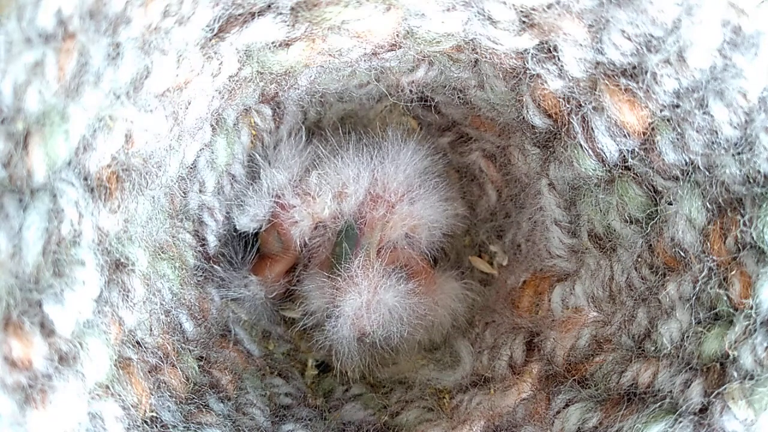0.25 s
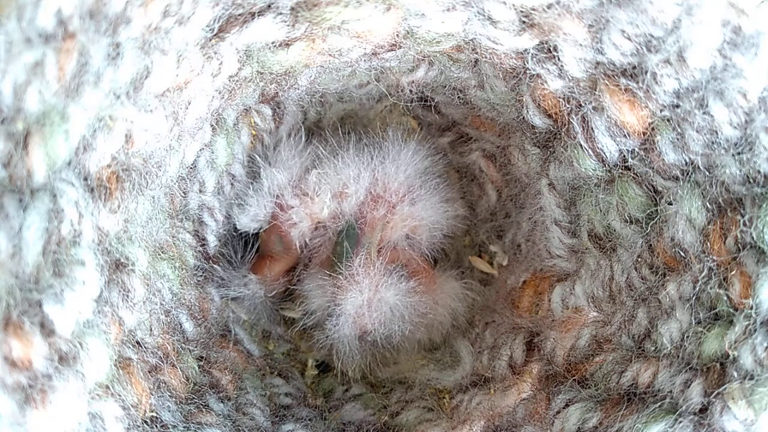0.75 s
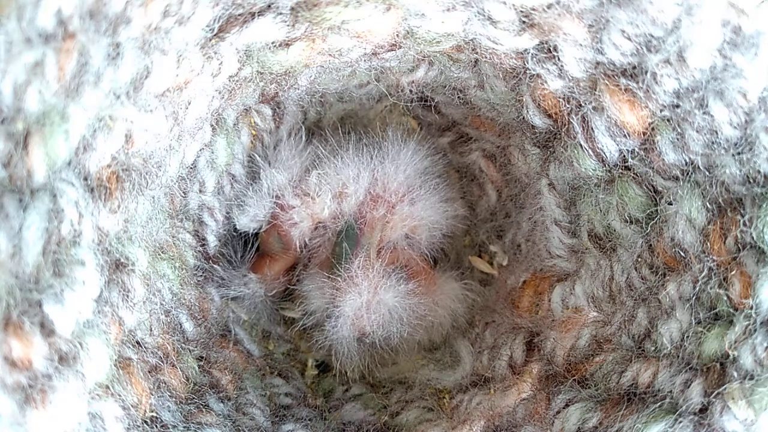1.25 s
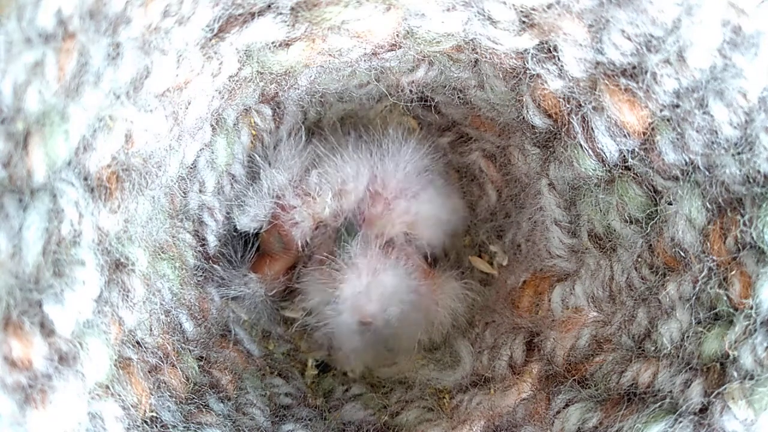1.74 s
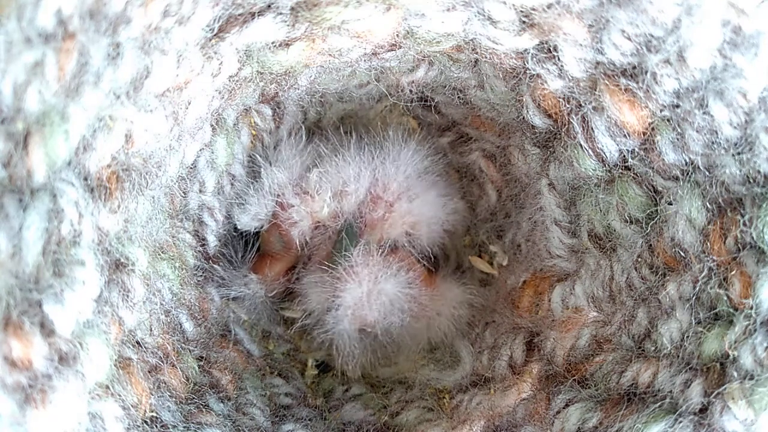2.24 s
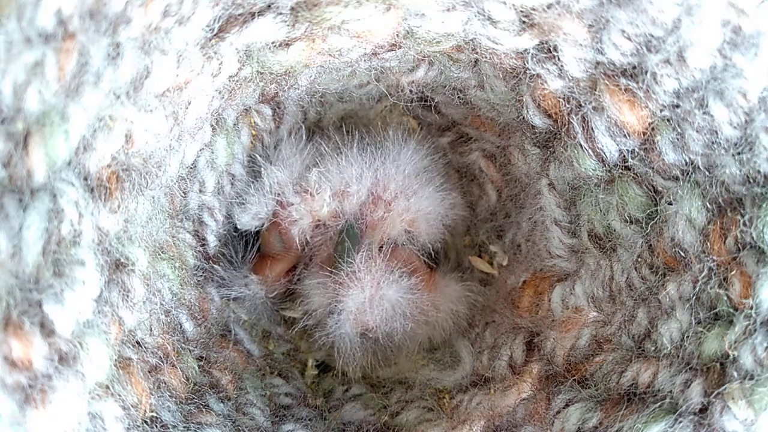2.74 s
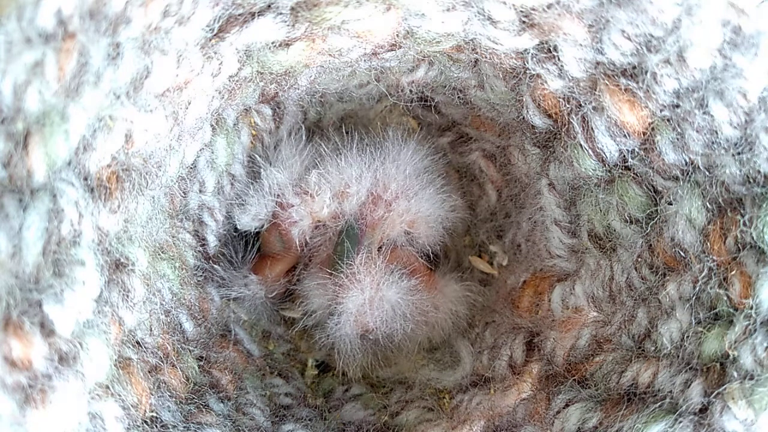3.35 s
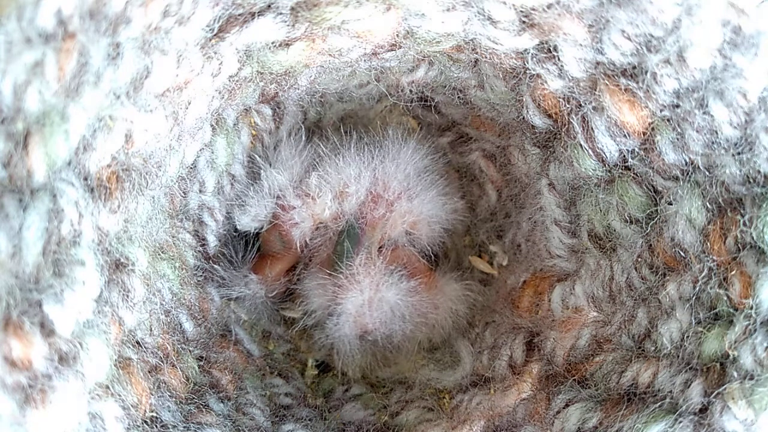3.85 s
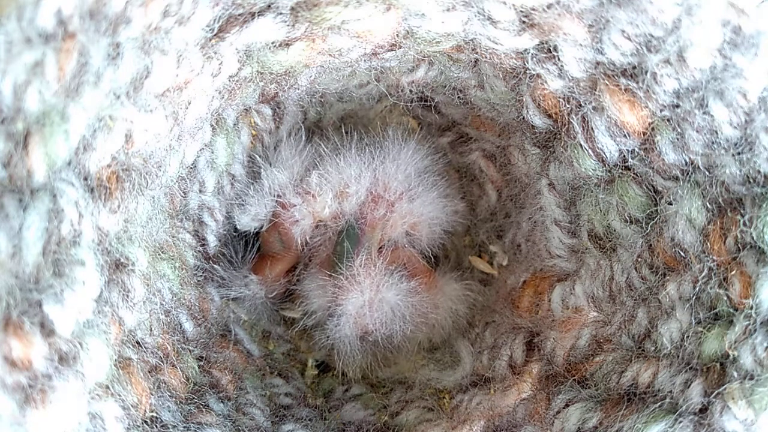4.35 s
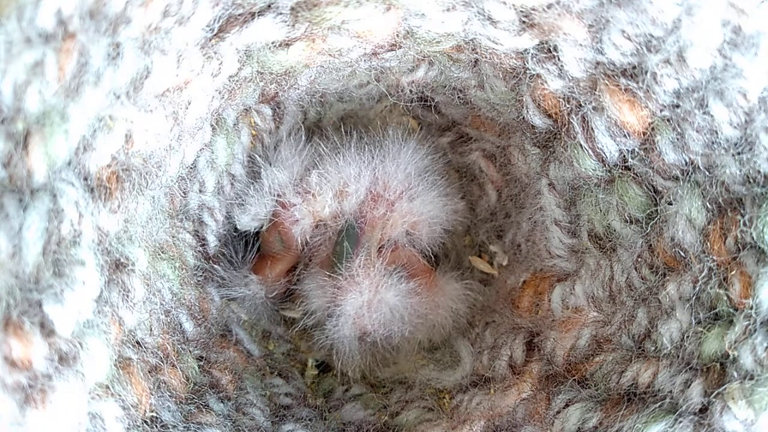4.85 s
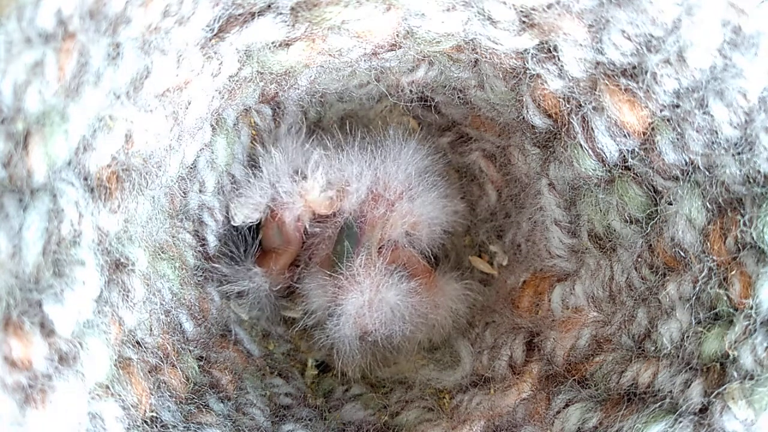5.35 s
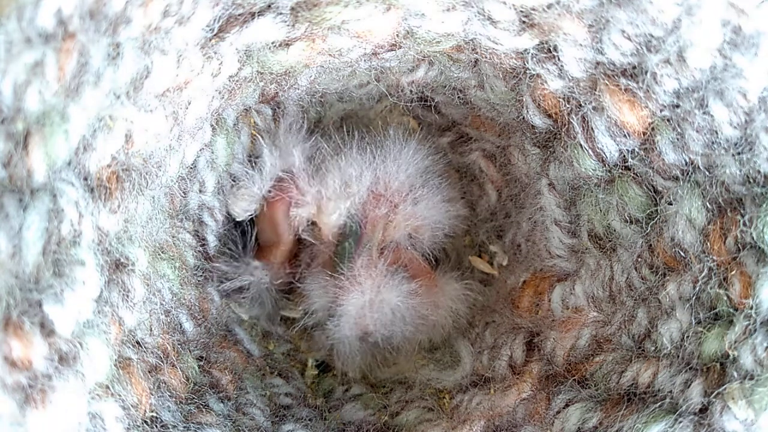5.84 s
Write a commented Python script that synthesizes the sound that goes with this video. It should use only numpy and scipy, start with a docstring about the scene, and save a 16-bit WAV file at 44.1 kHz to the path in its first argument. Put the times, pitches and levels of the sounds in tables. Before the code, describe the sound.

Sharp snaps and hollow taps with dry leaf and twig crackle close to a nest, over a faint outdoor hush with tiny distant bird rasps.

```python
"""Dry leaves and twigs crackle close to a nest: dense fibre noise swells to each snap and dies away.
Hard taps are a crack plus a damped sine; a farther knock and a long rub are noise through resonances.
One bird chirps near as a gliding sine with an overtone; another rasps far off as noise in a falling resonance.
Soft bumps ring the mount, faint far tones are narrow-band noise, and low gusts nudge two spaced
microphones over a faint outdoor hush, both partly coherent noise."""
import sys
import numpy as np
from scipy import signal
from scipy.io import wavfile
from scipy.ndimage import uniform_filter1d

SR = 44100
rng = np.random.default_rng(int(sys.argv[2]) if len(sys.argv) > 2 else 0)


def bounce(signal):
    """Save signal as a 16-bit WAV file at the path given by the first command-line argument."""
    frames = np.transpose(np.atleast_2d(signal))
    limited = np.clip(frames, -1, 1)
    pcm = np.round(limited * 32767).astype(np.int16)
    wavfile.write(sys.argv[1], SR, pcm)


N = 268216  # length in samples

# Spectrum of the body of breaking or rubbed fibres.
# Each row: frequency in Hz, relative spectral density in dB.
BODY_SPECTRUM = [(240, -64), (400, -12), (721, 4.5), (1420, 6.5), (1560, 1.5), (1810, 7), (3000, 1),
                 (3700, 5.5), (6000, -7.5), (7800, -36)]
# Spectrum of their treble.
# Each row: frequency in Hz, relative spectral density in dB.
TREBLE_SPECTRUM = [(2650, -19), (4500, -10), (5600, -8.5), (6820, -4.5), (8230, -1.5), (10100, -6.5),
                   (15100, -12.5), (15600, -25)]
LAG_S = 0.00029  # the left microphone hears first


def gain_of(db):
    """Level is logarithmic: 20 dB is a factor of ten in amplitude."""
    return 10 ** (np.asarray(db) / 20)


def evened(x):
    """Normalization of mean power: scales to rms 1."""
    return x / np.sqrt(np.mean(x ** 2) + 1e-20)


def read(points, hz):
    """Interpolation of a table along a logarithmic frequency axis."""
    f, value = np.transpose(points)
    return np.interp(np.log(hz + 1), np.log(f + 1), value)


def curve(rows):
    """Linear interpolation in time: the times and columns of a table, sample by sample."""
    s, *columns = np.transpose(rows)
    t = np.arange(s[0], s[-1], 1 / SR)
    return t, [np.interp(t, s, c) for c in columns]


def add(mix, s, sound, pan_db=0.):
    """Superposition: adds a sound at time s, panned by the level difference left minus right."""
    part = mix[:, round(s * SR):][:, :sound.shape[-1]]
    pan = gain_of([[pan_db / 2], [-pan_db / 2]])
    part += (sound * pan)[:, :part.shape[1]]


def resonate(x, hz, width):
    """Resonance by heterodyning: shifts hz down to zero, smooths, and shifts back."""
    turn = np.exp(2j * np.pi * np.cumsum(hz * np.ones(x.shape[-1])) / SR)
    r = np.exp(-np.pi * width / SR)
    smooth = signal.lfilter([1 - r], [1, -r], x / turn + 1e-18)
    return 2 * (turn * smooth).real


def noise(spectrum, patchy_db, lag_s):
    """Spatial coherence: noise alike in the bass at two microphones, with drifting spectral patches."""
    # Coherence of the two microphones. Each row: frequency in Hz, left-right likeness from 0 to 1.
    likeness = [(60, 1), (290, 0.75), (640, 0.73), (1400, 0.36), (4000, 0.12)]
    frames, hz = N // 256 + 5, np.fft.rfftfreq(1024, 1 / SR)[:, None]
    a, b, c, d, patches = rng.standard_normal((frames, len(hz), 5)).T
    patches = uniform_filter1d(patches, size=8, axis=0)
    patches = evened(uniform_filter1d(patches, size=10, axis=1))
    same = np.clip(read(likeness, hz), -1, 1)
    left = a + 1j * b
    shared = same * left * np.exp(-2j * np.pi * hz * lag_s)
    right = shared + np.sqrt(1 - same ** 2) * (c + 1j * d)
    inside = (hz >= spectrum[0][0]) & (hz <= spectrum[-1][0])
    z = np.array([left, right]) * inside * gain_of(read(spectrum, hz) + patchy_db * patches)
    return evened(signal.istft(z, nperseg=1024, noverlap=768)[1][:, :N])


def lumps(per_s, depth_db):
    """Random amplitude modulation: a gain that wanders at a pace of about per_s a second."""
    size = max(round(SR / per_s), 2)
    wander = uniform_filter1d(rng.standard_normal(N), size=size)
    wander = uniform_filter1d(wander, size=size)
    return evened(gain_of(depth_db * evened(wander)))


def air():
    """Turbulent pressure: slow gusts with a fluttering edge, over a steady broadband hush."""
    # Gusts on the microphones. Each row: time in seconds, rumble level in dB, flutter level in dB.
    gust_rows = [(0, -67.5, -65), (.22, -65.5, -70), (.41, -50.5, -57.5), (.56, -62.5, -69),
                 (1.45, -65, -67), (1.75, -63, -64.5), (2.5, -66, -68), (3.3, -64, -69), (3.64, -64, -62),
                 (4.55, -65, -70), (4.68, -62, -58), (4.82, -64, -69.5), (4.92, -62.5, -64.5),
                 (5.3, -64.5, -68), (6.09, -58, -57.5)]
    # Rumble of the gusts. Each row: frequency in Hz, relative spectral density in dB.
    rumble_spectrum = [(15, -35), (30, -4), (48, 1.5), (65, -1), (90, 5), (119, -14), (155, -19), (167, -1),
                       (285, -16.5), (320, -49), (420, -70)]
    # Bright edge of the gusts. Each row: frequency in Hz, relative spectral density in dB.
    flutter_spectrum = [(200, -2.5), (330, -12), (520, -3), (800, -13), (1300, -31.5)]
    # Outdoor hush. Each row: frequency in Hz, relative spectral density in dB.
    hush_spectrum = [(200, -61), (330, -10), (520, -8), (780, -12.5), (1000, -7), (1330, -12.5),
                     (1900, -15), (2330, -11.5), (5300, -16.5), (8320, -15), (15700, -29)]
    hush_db, hush_patchy_db = -63, 2.2
    t = np.arange(N) / SR
    s, rumble_db, flutter_db = np.transpose(gust_rows)
    rumble = noise(rumble_spectrum, 1.6, LAG_S)
    flutter = lumps(40, 1.5) * noise(flutter_spectrum, 1.5, LAG_S)
    gusts = gain_of(np.interp(t, s, rumble_db)) * rumble
    gusts += gain_of(np.interp(t, s, flutter_db)) * flutter
    hush = gain_of(hush_db) * noise(hush_spectrum, hush_patchy_db, LAG_S)
    return gusts * gain_of([[-.6], [.6]]) + hush


def far_tones():
    """Narrow-band noise: resonances filter noise into soft, airy far tones."""
    # Faint tones. Each row: start in seconds, end in seconds, frequency in Hz,
    # width of each of two resonances in series in Hz, level in dB.
    tone_rows = [(.17, .46, 497, 21, -62.5), (1.2, 1.366, 1580, 54, -73), (1.69, 1.87, 509.4, 11.4, -61),
                 (1.97, 2.25, 498.6, 26, -62.5), (3.5, 4.0, 496.2, 12, -65),
                 (4.887, 5.08, 3880, 250, -69.5)]
    out = np.zeros((2, N))
    for start, end, hz, width, db in tone_rows:
        airy = rng.standard_normal((2, round((end - start) * SR)))
        airy = airy + 0.3 * airy[::-1]  # partly alike left and right
        airy = resonate(resonate(airy, hz, width), hz, width)
        add(out, start, gain_of(db) * evened(airy) * signal.windows.tukey(airy.shape[1], .4))
    return out


def bumps():
    """Damped oscillation: the mount wobbles at an unsteady low pitch, with a shudder and two overtones."""
    # Soft bumps through the mount. Each row: start in seconds, level in dB, pitch in Hz, t60 in seconds.
    bump_rows = [(0.294, -53, 80.4, 0.11), (0.351, -57, 97, 0.15), (0.431, -36.5, 150, 0.034),
                 (0.638, -54.5, 100.7, 0.28), (1.624, -40.5, 122.6, 0.33), (2.697, -48.5, 76, 0.11),
                 (2.947, -51, 85.4, 0.23), (3.456, -35.5, 164, 0.16), (3.464, -30.5, 329, 0.036),
                 (4.627, -44.5, 178.2, 0.37), (4.687, -49.5, 163.6, 0.2), (4.746, -56, 179, 0.2),
                 (4.876, -46.5, 290.8, 0.31), (5.672, -29, 60.6, 0.046)]
    # Overtones of a bump. Each row: multiple of its pitch, level in dB, share of its t60.
    overtones = [(2.28, -10, 0.78), (4.3, -8.5, 0.75)]
    stiff_hz = 900  # overtones from here up are left out
    t, out = np.arange(0, .4, 1 / SR), np.zeros((2, N))
    pushes = rng.standard_normal((len(bump_rows), 2, len(t)))
    for (s, db, hz, t60), push in zip(bump_rows, pushes):
        decay_s = max(t60, .02)
        push = push + 0.5 * push[::-1]  # partly alike left and right
        shudder = evened(resonate(resonate(push, 1.06 * hz, 4.7 * hz), 0.52 * hz, 1.6 * hz))
        sway = evened(resonate(resonate(push, hz, 0.8 * hz), hz, 0.8 * hz))
        rings = 0
        for multiple, ring_db, share in overtones:
            if multiple * hz < stiff_hz:
                fade = gain_of(ring_db - 60 * t / decay_s * (1 / share - 1))
                rings = rings + fade * np.sin(2 * np.pi * multiple * hz * t)
        # the noisy part dies more slowly than the tone
        unsteady = (0.14 * shudder + 0.4 * sway) * gain_of(20 * t / decay_s)
        wobble = 0.75 * np.sin(2 * np.pi * hz * t) + rings + unsteady
        onset = (1 - np.exp(-t * hz / 0.18)) ** 2
        add(out, s, gain_of(db - 60 * t / decay_s) * onset * wobble, -1.5)
    return out


def rasps():
    """Time-varying resonance: a falling resonance turns noise into far hoarse notes."""
    # Far rasps. Each row: start in seconds, length in seconds, peak level in dB, starting pitch in Hz.
    rasp_rows = [(0.433, 0.25, -55.5, 4180), (2.831, 0.23, -54.5, 4200), (4.089, .21, -57.5, 4200),
                 (5.665, 0.25, -53, 3680)]
    peak_share, ends_db, sag_hz = 0.25, -14.5, 616  # peak time as share of length; ends re peak; pitch fall
    out = np.zeros((2, N))
    for start, length, peak_db, hz in rasp_rows:
        t, (db, pitch_hz) = curve([(start, peak_db + ends_db, hz),
                                   (start + peak_share * length, peak_db, hz - 0.25 * sag_hz),
                                   (start + length, peak_db + ends_db, hz - sag_hz)])
        breath = rng.standard_normal((2, len(t)))
        hoarse = resonate(resonate(breath, pitch_hz, 1400), pitch_hz, 1400)
        add(out, t[0], gain_of(db) * evened(hoarse) * signal.windows.tukey(len(t), .3))
    return out


def taps():
    """Impulse excitation: a brief band-limited crack starts a short hollow ring, a damped sine."""
    # Hollow taps. Each row: start in seconds, ring level in dB, ring frequency in Hz, ring t60 in seconds,
    # crack peak level in dB, pan left minus right in dB, delay of the right microphone in milliseconds.
    tap_rows = [(.434, -42, 548, 0.035, -70, -8, 0.3), (0.933, -44, 1230, 0.011, -62, 1, 0.24),
                (1.627, -12.5, 970, 0.014, -9, -6, 0.26), (1.6283, -12, 3780, 0.021, -18, -1, 0.072),
                (1.753, -33, 1740, 0.0071, -47, 7, 0.059), (1.7935, -36, 1870, 0.0091, -52, 6, 0.11),
                (2.052, -24.5, 1650, 0.015, -47, 0, -0.2), (2.0754, -1, 1630, 0.0046, -29, -1, -0.13),
                (2.0758, -20, 3430, 0.0074, -50, 0, -0.075), (2.0796, -31, 1900, .014, -52, 3, -0.01),
                (2.086, -25, 1690, 0.015, -54, 1.5, -0.13), (3.008, -46.5, 2440, 0.029, -46, 13, 0.12),
                (3.4494, 0.5, 1260, 0.0024, -9, 3, 0.091), (3.464, -22, 700, 0.014, -22, 4, 0.087),
                (3.468, -19, 1750, .008, -26, 8, 0.078), (3.648, -18, 1310, 0.0051, -42, 2, 0.17),
                (3.717, -28, 1415, 0.016, -43.5, 1, 0.21), (3.864, -31, 1340, 0.022, -43, 0, 0.2),
                (4.592, -39, 1270, 0.013, -62, -3, 0.15), (4.607, -31, 1240, 0.012, -57, -4, 0.13),
                (4.63, -17.5, 1260, 0.011, -36, -4, 0.13), (4.814, -28.5, 1670, 0.0091, -40, 0, 0.23),
                (4.888, -42.5, 1045, 0.055, -60, -3, 0.27), (5.599, -36, 1112, 0.029, -65, -10, 0.26),
                (5.884, -37, 1050, 0.038, -59, -1, 0.25), (6.041, -48, 2350, 0.045, -55, -7, .2)]
    lead = 40  # samples of silence ahead, room for a right microphone that hears first
    t, out = np.arange(0, .12, 1 / SR), np.zeros((2, N))
    chips = rng.standard_normal((len(tap_rows), len(t))) * np.exp(-t / 3e-4)
    chips[:, 0] = 3
    band = signal.butter(2, [2000, 4600], "bandpass", fs=SR, output="sos")
    cracks = signal.sosfilt(band, chips)
    for (s, ring_db, hz, t60, crack_db, pan_db, late_ms), crack in zip(tap_rows, cracks):
        decay = gain_of(ring_db - 60 * t / max(t60, .004))
        onset = (1 - np.exp(-t / 0.00065)) ** 2
        ring = decay * onset * np.sin(2 * np.pi * hz * t)
        tap = np.pad(ring + gain_of(crack_db) * crack / abs(crack).max(), (lead, 0))
        late = np.roll(tap, round(late_ms * SR / 1000))
        add(out, s - lead / SR, np.array([tap, late]), pan_db)
    return out


def knock():
    """Modal resonance: a farther blow on a hollow thing and its scattered echoes ring the same modes."""
    # Modes of the hollow thing. Each row: frequency in Hz, width of each of two resonances in series
    # in Hz, relative level in dB.
    mode_rows = [(688, 89, -5), (1123, 120, -4.5), (1544, 330, -1), (2660, 570, -2), (7340, 550, -10),
                 (6900, 12000, -3.5)]
    start_s, level_db, t60 = 1.113, -42, .24
    t, out = np.arange(0, .3, 1 / SR), np.zeros((2, N))
    echoes = rng.standard_normal((2, len(t))) * lumps(120, 0.73)[:len(t)]
    rings = evened(sum(gain_of(db) * evened(resonate(resonate(echoes, f, w), f, w))
                       for f, w, db in mode_rows))
    envelope = gain_of(level_db - 60 * t / t60) * (1 - np.exp(-t / 0.00046))
    add(out, start_s, envelope * rings, -3.5)
    return out


def crackles():
    """Superposed fractures: many fibres break in a rush that swells and dies; the treble starts earlier."""
    # Crackling leaves and twigs. Each row: time of the peak in seconds, body level in dB,
    # treble level in dB, pan left minus right in dB, t60 of the body in seconds.
    crackle_rows = [(1.546, -61, -47.5, -3.5, 0.24), (1.622, -31, -27, 4.5, 0.049),
                    (1.63, -22.5, -22.5, 0, 0.093), (1.66, -43, -47.5, 0, 0.24),
                    (1.723, -50.5, -56, 0, 0.31), (1.764, -52, -45, 1, 0.067), (1.797, -53, -64, 2, 0.042),
                    (2.048, -52, -40, -0.5, 0.15), (2.077, -41, -37.5, 0.5, 0.083),
                    (3.419, -44.5, -45, 1, 0.15), (3.446, -29, -34, -6.5, 0.083),
                    (3.454, -31.5, -29, 4, 0.11), (3.466, -28, -31, -1, 0.089), (3.5, -58, -58, 1, 0.23),
                    (3.65, -59, -61, -3, 0.087), (3.797, -56.5, -60, -1, 0.084),
                    (3.868, -65, -55, -4, 0.13), (4.539, -69, -55.5, -1.5, 0.15),
                    (4.592, -57.5, -47.5, -0.97, 0.14), (4.628, -50.5, -43.5, 0, 0.095),
                    (4.669, -59, -51.5, -2, 0.43), (4.815, -50, -37.5, -1, 0.11),
                    (4.885, -62.5, -55.5, -2, 0.25), (5.665, -55.5, -50.5, 0, 0.27),
                    (5.88, -56.5, -50, 1, 0.11), (5.975, -60, -54, 1, 0.38), (6.044, -60, -51, -2.5, 0.087)]
    swell_s, swell_share = 0.0014, 0.03  # basic rise: seconds, plus this share of the t60
    grit = lumps(630, 1.1) * lumps(230, 0.47)
    body = grit * noise(BODY_SPECTRUM, 2.4, 1e-4)
    treble = np.sqrt(grit) * noise(TREBLE_SPECTRUM, 2.4, 1e-4)
    t, out = np.arange(-.05, .3, 1 / SR), np.zeros((2, N))

    def shape(fibres, rise, t60):
        """Exponential growth and decay about the peak, with the energy of the envelope kept."""
        growth = np.exp(np.minimum(t, 0) / max(rise, 2e-4))
        swell = np.where(t < 0, growth, gain_of(-60 * t / max(t60, .01)))
        return evened(fibres * swell) * np.sqrt(np.mean(swell ** 2))

    for s, body_db, treble_db, pan_db, t60 in crackle_rows:
        at = (round((s + t[0]) * SR) + np.arange(len(t))) % N
        rise = swell_s + swell_share * t60
        rush = gain_of(body_db) * shape(body[:, at], 0.76 * rise, t60)
        rush += gain_of(treble_db) * shape(treble[:, at], 1.12 * rise, 0.85 * t60)
        add(out, s + t[0], rush, pan_db)
    return out


def chirp():
    """Frequency modulation: integrating a gliding pitch gives the phase of a near whistle and its octave."""
    # Near chirp. Each row: time in seconds, pitch in Hz, rms level of the fundamental in dB.
    chirp_rows = [(4.683, 3290, -48), (4.694, 3730, -33), (4.703, 3857, -40), (4.712, 3800, -65)]
    overtone_db = -20.5  # relative to the fundamental
    out = np.zeros((2, N))
    t, (hz, db) = curve(chirp_rows)
    turn = 2 * np.pi * np.cumsum(hz) / SR
    whistle = np.sin(turn) + gain_of(overtone_db) * np.sin(2 * turn)
    whistle = np.sqrt(2) * gain_of(db) * whistle
    add(out, t[0], whistle * signal.windows.tukey(len(t), .3), 9.)
    return out


def rub():
    """Stick-slip friction: uneven slips excite a hollow hum, over a hiss of leaves."""
    # A long rub through the leaves. Each row: time in seconds, hollow hum level in dB.
    rub_rows = [(5.585, -65), (5.6, -50), (5.635, -50.5), (5.72, -73), (5.77, -60), (5.795, -50.5),
                (5.83, -54), (5.845, -56), (5.87, -59), (5.92, -54.5), (5.945, -53.5), (5.99, -54),
                (6.03, -48), (6.09, -51)]
    # Modes of the hum. Each row: frequency in Hz, width in Hz, gain in dB.
    mode_rows = [(337, 68, 7), (710, 110, -2), (1053, 35, 7), (2280, 124, -4.5)]
    hiss_db = -58.5
    t, (hum_db,) = curve(rub_rows)
    slips = lumps(60, 1.3) * lumps(270, 1.6) * noise(BODY_SPECTRUM, 2.7, LAG_S)
    slips = slips[:, :len(t)]
    hum = sum(gain_of(db) * resonate(slips, f, w) for f, w, db in mode_rows) + 0.099 * slips
    hiss = lumps(200, 1.2) * lumps(28, 3.1) * noise(TREBLE_SPECTRUM, 3.5, LAG_S)
    hiss = hiss[:, :len(t)]
    fade_in = signal.windows.tukey(2 * len(t), .06)[:len(t)]
    out = np.zeros((2, N))
    rubbed = gain_of(hum_db) * evened(hum) + gain_of(hiss_db) * evened(hiss) * fade_in
    add(out, t[0], rubbed, -1.5)
    return out


def thicket(x, t60, dull_hz):
    """Multiple scattering: branches return a short, dull, dying tail, another one to each microphone."""
    t = np.arange(0, .25, 1 / SR)
    signs = rng.choice([-1., 1.], (2, len(t)))
    sparse = rng.random((2, len(t))) < .06
    tail = signs * sparse * gain_of(-60 * t / t60) * (t > .002)
    tail = signal.lfilter(*signal.butter(1, dull_hz, fs=SR), tail)
    return signal.fftconvolve(x, tail / np.linalg.norm(tail[0]), axes=1)[:, :N]


def scene():
    """Linear superposition of all sources, the taps and the birds with their scattered tails."""
    knocks = taps()
    songs = far_tones() + rasps() + chirp()
    near = bumps() + knocks + knock() + crackles() + rub()
    tails = gain_of(-16.0) * thicket(knocks, 0.11, 1940) + gain_of(-17.5) * thicket(songs, 0.098, 6000)
    return air() + near + songs + tails


def record(dry):
    """Band limitation: the microphones lose the deepest bass, then a steep low-pass ends the treble."""
    edge_hz = 15760
    heard = signal.sosfilt(signal.butter(3, 42, "highpass", fs=SR, output="sos"), dry)
    lowpass = signal.firwin(511, edge_hz, window=("kaiser", 9), fs=SR)
    return signal.oaconvolve(heard, lowpass[None], "same")


dry = scene()
out = record(dry)
bounce(out)
```